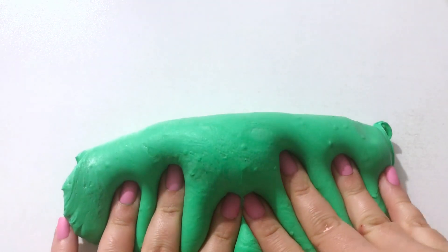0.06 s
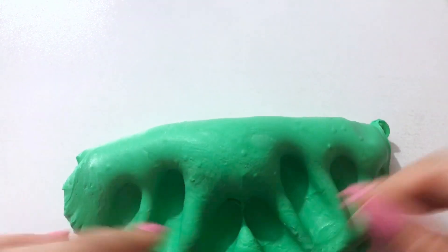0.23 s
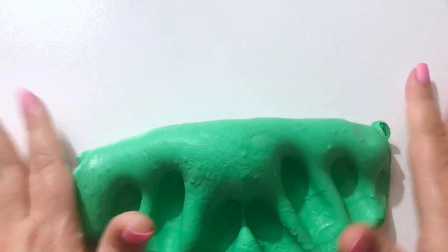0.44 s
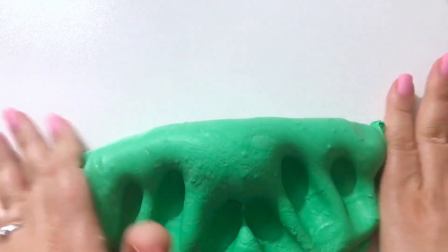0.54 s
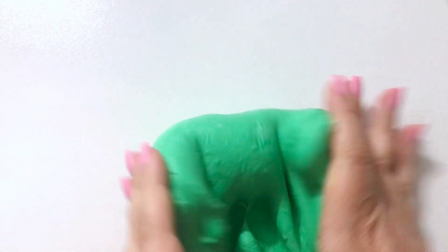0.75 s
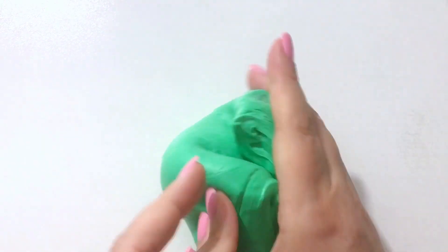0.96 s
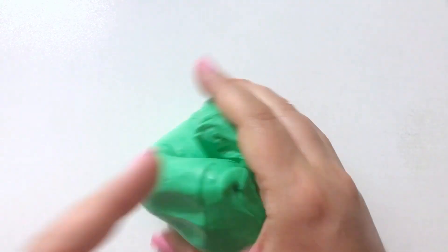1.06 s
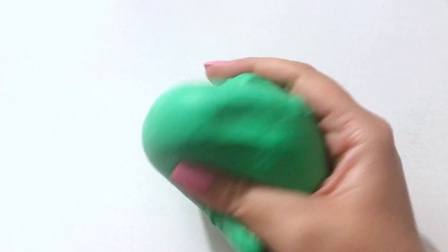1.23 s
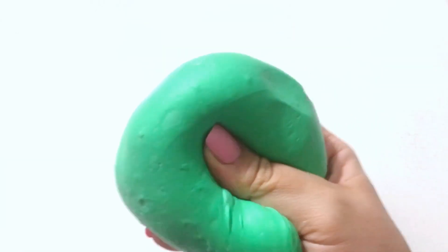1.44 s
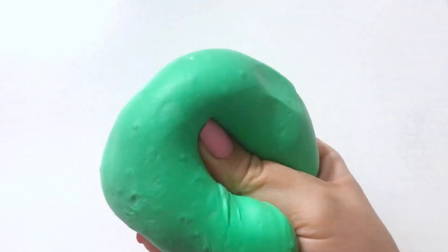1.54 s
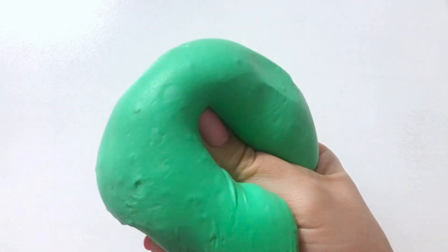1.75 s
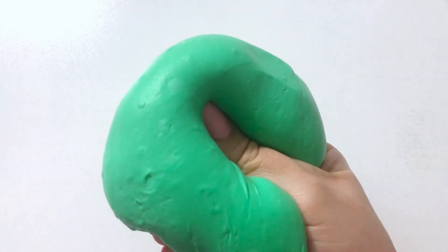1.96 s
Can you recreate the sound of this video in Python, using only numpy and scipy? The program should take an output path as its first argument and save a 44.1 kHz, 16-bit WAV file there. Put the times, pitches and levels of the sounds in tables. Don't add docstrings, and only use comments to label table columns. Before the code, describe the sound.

Wet slime squelching under hands on a table, with short sucks, sticky smacks, a bright bubble burst and fine fizz, thinning to scattered ticks; very low table thumps, faint air noise, close phone microphone indoors.

```python
import sys
import numpy as np
from scipy import signal
from scipy.fft import rfft, irfft
from scipy.io import wavfile
from scipy.ndimage import uniform_filter1d

SR = 44100
rng = np.random.default_rng(int(sys.argv[2]) if len(sys.argv) > 2 else 0)


def store_pcm(level_fs):
    pcm = np.round(np.clip(level_fs, -1, 1) * 32767).astype(np.int16)
    wavfile.write(sys.argv[1], SR, np.atleast_2d(pcm).T)


def amplitude_ratio(level_db):
    exponent = np.asarray(level_db, float) / 20
    return 10 ** exponent


N = 88200
LAG_S = 0.0008


def evened(x):
    return x / np.sqrt(np.mean(x ** 2) + 1e-20)


def along(table, order=1):
    rows = np.array(table)
    return np.interp(np.arange(N) / SR, rows[:, 0], rows[:, order])


def tinted(x, points):
    hz = np.fft.rfftfreq(N, 1 / SR) + 1
    point_hz, point_db = np.transpose(points)
    below_db = -24 * np.maximum(np.log2(point_hz[0] / hz), 0)
    above_db = -200 * np.maximum(np.log2(hz / point_hz[-1]), 0)
    colour_db = np.interp(np.log(hz), np.log(point_hz), point_db)
    return evened(irfft(rfft(x) * amplitude_ratio(colour_db + below_db + above_db), N))


def resonate(x, hz, width_hz):
    turn = np.exp(2j * np.pi * np.cumsum(hz * np.ones(len(x))) / SR)
    r = np.exp(-np.pi * width_hz / SR)
    return 2 * (turn * signal.lfilter([1 - r], [1, -r], x / turn)).real


def grains(per_s, spread_db):
    size = amplitude_ratio(spread_db * np.minimum(rng.exponential(1, N), 5)) * rng.standard_normal(N)
    return size * (rng.random(N) < per_s / SR)


def add(mix, start_s, sound):
    part = mix[round(start_s * SR):][:len(sound)]
    part += sound[:len(part)]


def patchy(x):
    z = signal.stft(x, nperseg=256)[2]
    patches = rng.standard_normal(z.shape[::-1]).T
    patches = uniform_filter1d(patches, size=7, axis=0)
    patches = evened(uniform_filter1d(patches, size=5, axis=1))
    patch_db = 1.5
    return evened(signal.istft(z * amplitude_ratio(patch_db * patches), nperseg=256)[1][:N])


def fizz():
    # pitch_hz, density_db (dB per Hz)
    fizz_colour = [(880, -7), (1500, -12.5), (1830, -13), (3410, -15.5), (7100, -7), (10600, -11),
                   (14600, -11.5), (15700, -16.5)]
    return patchy(tinted(grains(per_s=22000, spread_db=2), fizz_colour))


def squelch():
    # pitch_hz, width_hz, level_db
    folds = [(1300, 590, 8), (2500, 420, 1.5), (600, 280, -2)]
    drive = grains(per_s=2500, spread_db=2)
    wander = uniform_filter1d(rng.standard_normal(N), size=1500)
    shape = 1 + 0.1 * evened(uniform_filter1d(wander, size=1500))
    wet = np.zeros(N)
    for hz, width_hz, db in folds:
        once = resonate(drive, hz * shape, width_hz)
        wet += amplitude_ratio(db) * evened(resonate(once, hz * shape, width_hz))
    return evened(wet)


def rub():
    # time_s, fizz_db, squelch_db
    strokes = [(0, -100, -100), (.14, -82, -91), (.17, -62.5, -68), (.22, -58, -67.5), (.25, -65, -76),
               (.275, -71.5, -67.5), (.29, -84, -86.5), (.46, -89, -95), (.515, -74, -71.5),
               (.6, -73.5, -77), (.64, -65, -70), (.735, -66, -72), (.76, -63, -65.5), (.8, -62.5, -73),
               (.855, -63.5, -74), (.875, -71.5, -77), (1.045, -76.5, -81), (1.07, -65, -72),
               (1.15, -79, -80), (1.185, -69, -73.5), (1.235, -66, -82), (1.27, -77, -80.5),
               (1.42, -84, -91), (2, -88.5, -104)]
    flicker_db = 1.5
    flicker = amplitude_ratio(flicker_db * evened(uniform_filter1d(rng.standard_normal(N), 500)))
    return flicker * (fizz() * amplitude_ratio(along(strokes)) + squelch() * amplitude_ratio(along(strokes, order=2)))


def suck():
    # start_s, length_s, level_db
    pulls = [
        (0.167, 0.14, -63),
        (0.205, 0.052, -56),
        (0.482, 0.047, -67.5),
        (0.745, 0.098, -71.5),
        (1.056, 0.055, -65.5),
        (1.189, 0.048, -71),
        (1.236, 0.025, -67),
    ]
    # pitch_hz, density_db (dB per Hz)
    suck_colour = [(85, 7), (115, -10), (153, 1.5), (190, -15), (236, -3.5), (330, -7.5), (700, -9),
                   (1500, -21), (3000, -38)]
    pull = np.zeros(N)
    for start_s, length_s, db in pulls:
        add(pull, start_s, amplitude_ratio(db) * np.hanning(round(length_s * SR)) ** 0.49)
    return tinted(grains(per_s=5000, spread_db=1.8), suck_colour) * pull


def tick(db, hz, crack_db):
    ring_cycles, scatter_db, scatter_t60_s, floor_hz = 5.6, -14, 0.011, 500
    t = np.arange(900) / SR
    ring = np.cos(2 * np.pi * hz * t) * np.exp(-3 * hz * t / ring_cycles)
    crack = amplitude_ratio(crack_db) * np.exp(-t / 0.000012)
    scatter = amplitude_ratio(scatter_db - 60 * t / scatter_t60_s) * rng.standard_normal(len(t)) * (t > 0.0002)
    scatter[0] = 1
    thin = signal.butter(2, [min(floor_hz + hz / 3, 4000), 16500], "band", fs=SR)
    return amplitude_ratio(db) * signal.lfilter(*thin, signal.fftconvolve(ring + crack, scatter)[:len(t)])


def ticks():
    # start_s, peak_db, pitch_hz, crack_db (flat crack beside the ring)
    bursts = [(.4668, -66, 1400, 10), (0.489, -70, 8000, -5), (.5450, -62, 4940, 3),
              (0.6273, -51.5, 2900, 3), (0.6885, -53.5, 2340, 11), (0.748, -58, 5000, 17.5),
              (0.8807, -67, 3000, 12), (0.9258, -62, 5100, 18), (1.063, -65, 5900, 0),
              (1.0809, -35.5, 7020, -21), (1.1106, -48.5, 11500, 7), (1.156, -64, 2500, 16.5),
              (1.1914, -51, 6500, 5.5), (1.2417, -58, 2760, 24), (1.295, -59, 9000, 2),
              (1.3254, -49, 6540, -30), (1.3402, -59, 11000, -6), (1.3494, -48.5, 8800, -36),
              (1.3979, -56, 6450, -6), (1.4882, -55.5, 7500, -11), (1.5205, -46.5, 7000, -26),
              (1.6013, -66.5, 4030, -17), (1.647, -70, 7800, 7), (1.7075, -64.5, 6500, -25),
              (1.752, -49.5, 4940, 6), (1.7576, -54.5, 4260, 10.5), (1.7803, -59.5, 12000, 8.5),
              (1.8850, -53.5, 4670, 4), (1.8855, -50, 6040, -43.5), (1.9688, -63, 7060, 7.5),
              (1.4487, -69.5, 2000, 14.5), (0.2625, -56, 7900, 9), (0.91, -76, 5000, 4),
              (1.1728, -62, 7000, -2), (1.3976, -60.5, 2650, 2.5), (1.5967, -73, 7000, 4),
              (1.672, -73, 6000, 13), (1.8637, -75, 5970, 8), (1.9553, -68, 9000, -3),
              (1.955, -73, 4000, -10)]
    out = np.zeros(N)
    for start_s, db, hz, crack_db in bursts:
        add(out, start_s + LAG_S, tick(db, hz, crack_db))
    return out


def smack(db, hz, cycles):
    sag_per_s, edge_db = 42.4, -15.5
    t = np.arange(900) / SR
    sagging = t * (1 - sag_per_s * np.minimum(t, 0.004))
    ring = np.sin(2 * np.pi * hz * sagging) * np.exp(-2.5 * hz * t / cycles)
    onset = np.minimum(t * hz * 1.09, 1)
    edge = np.convolve(rng.standard_normal(len(t)), np.hanning(7), "same") / 2 * np.exp(-t / 0.0013)
    return amplitude_ratio(db) * (ring * onset + amplitude_ratio(edge_db) * edge)


def smacks():
    # start_s, peak_db, pitch_hz, ring_cycles
    closings = [(.0330, -58, 3550, 1.8), (0.173, -37, 2300, 1.84), (.2130, -45, 720, 3.5),
                (.2240, -47, 620, 2.5), (0.2420, -41, 1390, 4.2), (.3970, -65, 6960, 5),
                (.5145, -50.5, 1300, 5.2), (.6275, -44.5, 6800, 7.1), (0.6452, -42.5, 900, 2.37),
                (.6690, -51, 6480, 4.2), (.7522, -36.5, 1710, 2.4), (0.7598, -45, 2500, 2.5),
                (.7600, -47, 600, 2.3), (0.762, -48.5, 1300, 4.3), (0.846, -50, 7600, 4.4),
                (.9980, -61.5, 4300, 16), (1.074, -52.5, 2600, 3.5), (1.0760, -56.5, 600, 5.7),
                (1.093, -62, 500, 4.1), (1.1800, -58, 675, 3.2), (1.2000, -60.5, 450, 5.4),
                (1.2416, -52.5, 2900, 6), (1.2450, -45.5, 600, 2.2), (1.3976, -41, 940, 1.24),
                (1.449, -47, 1350, 1.8), (1.6703, -68.5, 600, 7), (1.7518, -44.5, 2350, 2),
                (1.9549, -62, 2410, 5), (1.9620, -49, 1860, 1.2), (.1800, -51.5, 1200, 4.3),
                (.2310, -53, 2070, 4.5), (.2335, -43, 620, 3.1), (.2450, -40.5, 840, 3.5),
                (0.747, -37.5, 2150, 2.7), (0.7538, -47.5, 1600, 6), (.7980, -55, 1450, 4),
                (1.4350, -60.5, 2600, 5.6), (1.451, -64, 1100, 4.4), (1.4590, -61, 1250, 4),
                (1.7574, -51, 2200, 1.7)]
    out = np.zeros(N)
    for start_s, db, hz, cycles in closings:
        add(out, start_s + LAG_S, smack(db, hz, cycles))
    return out


def snap():
    # pitch_hz, level_db, t60_s
    pocket_modes = [(1023, -43, 0.012), (1550, -41.5, 0.0066), (2650, -44.5, 0.0062), (3430, -41.5, 0.0045),
                    (4340, -41, 0.0079), (4950, -47.5, 0.0087), (6700, -48, 0.013), (7200, -43, 0.0091),
                    (8340, -42, 0.0059), (9250, -49, 0.006), (10100, -46, 0.0074), (11300, -40, 0.0044),
                    (13000, -37.5, 0.0052), (15300, -42, 0.003)]
    t = np.arange(1500) / SR
    ring = np.zeros(len(t))
    for k, (hz, db, t60_s) in enumerate(pocket_modes):
        ring += (-1) ** k * amplitude_ratio(db - 60 * t / t60_s) * np.sin(2 * np.pi * hz * t)
    out, floor_hz = np.zeros(N), 450
    add(out, 0.5076, signal.lfilter(*signal.butter(2, floor_hz, "high", fs=SR), ring))
    return out


def room(x):
    level_db, t60_s, top_hz = -18, 0.1, 7500
    t = np.arange(SR // 4) / SR
    tail = rng.standard_normal(len(t)) * amplitude_ratio(-60 * t / t60_s) * (t > 0.003)
    tail = signal.lfilter(*signal.butter(2, top_hz, fs=SR), tail)
    return amplitude_ratio(level_db) * signal.fftconvolve(x, tail / np.linalg.norm(tail))[:N]


def sway():
    # start_s, length_s, peak_db, pitch_hz, peak_place (0-1 of the length)
    swings = [(0, 0.19, -48.5, 35.1, 0.17), (0.132, 0.17, -35.5, 36.3, 0.69),
              (0.254, 0.047, -39, 57.4, 0.43), (0.294, 0.087, -37.5, 33, 0.29),
              (0.376, 0.12, -45.5, 35, 0.21), (0.468, 0.1, -31.5, 36.6, 0.53), (0.47, 0.063, -59, 75, .5),
              (0.565, 0.23, -31.5, 35, 0.4), (0.787, 0.074, -38.5, 40.5, 0.54),
              (0.81, 0.25, -33, 37.05, 0.5), (1.013, 0.25, -29, 35.46, 0.46),
              (1.048, 0.11, -57, 63.4, 0.37), (1.244, 0.25, -41, 34.3, 0.2), (1.445, 0.21, -52.5, 35, .4)]
    tremor_db, tremor_hz, width_hz = -70, 35, 34
    tremor = rng.standard_normal(N)
    for width in (width_hz, width_hz, 2 * width_hz):
        tremor = resonate(tremor, tremor_hz, width)
    out = amplitude_ratio(tremor_db) * evened(tremor)
    for start_s, length_s, db, hz, peak in swings:
        t = np.arange(0, length_s, 1 / SR)
        lean = np.log(0.5) / np.log(np.clip(peak, 0.3, 0.8))
        arch = np.sin(np.pi * (t / length_s) ** lean) ** 1.4
        add(out, start_s, amplitude_ratio(db) * arch * np.cos(2 * np.pi * hz * (t - peak * length_s)))
    return out


def air():
    # pitch_hz, density_db (dB per Hz)
    air_colour = [(55, -12), (110, 2), (250, -3.5), (600, -10), (1250, -10), (2000, -20.5), (4500, -22.5),
                  (7000, -26.5), (15700, -29)]
    level_db = -79
    return amplitude_ratio(level_db) * tinted(rng.standard_normal(N), air_colour)


def scene():
    pops = ticks() + smacks() + snap()
    return (rub() + suck() + pops + room(pops) + sway() + air())[None]


def low_pass(x):
    return signal.sosfilt(signal.butter(12, 16810, fs=SR, output="sos"), x)


def record(dry):
    edge_hz = 16700
    edge = signal.firwin(255, edge_hz, window=("kaiser", 9), fs=SR)[None]
    return low_pass(signal.oaconvolve(dry, edge, "same"))


dry = scene()
out = record(dry)
store_pcm(out)
```